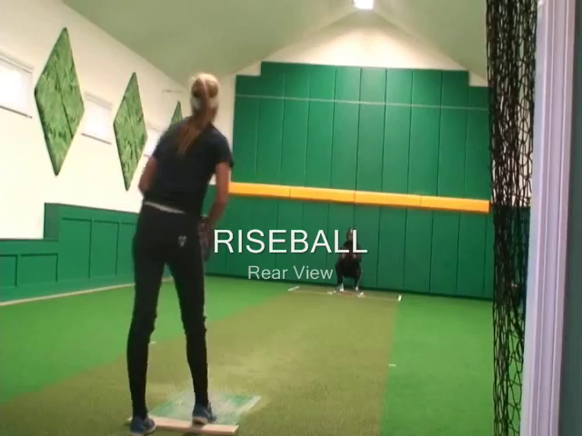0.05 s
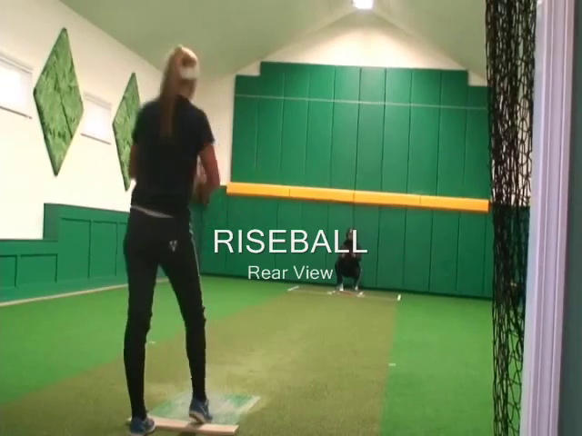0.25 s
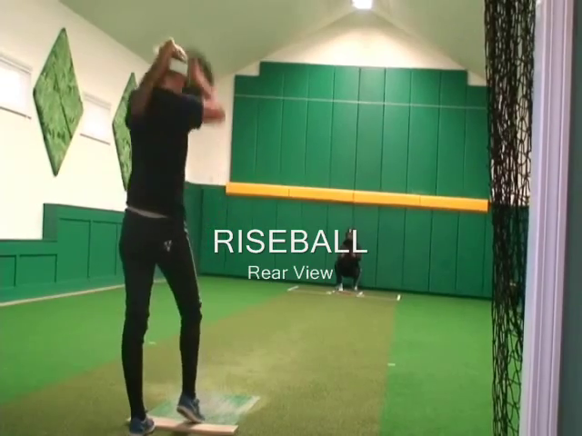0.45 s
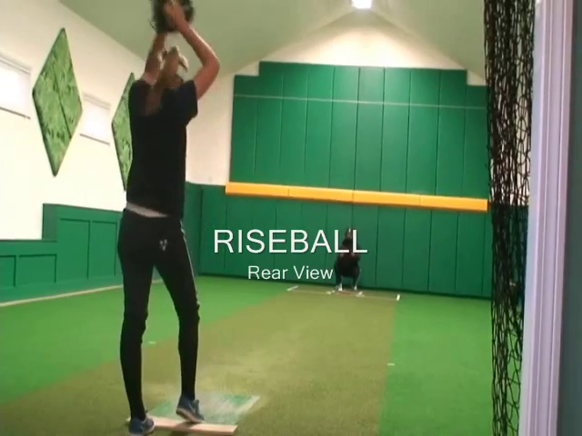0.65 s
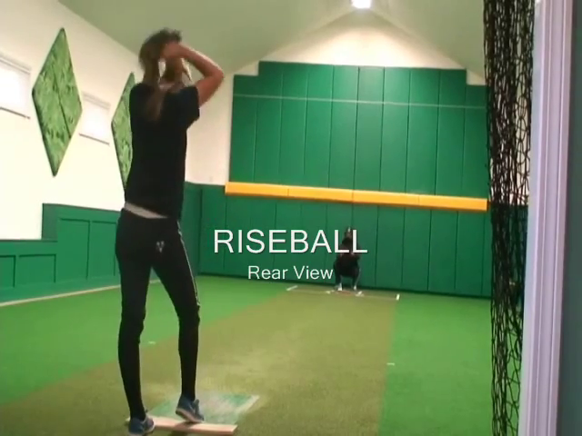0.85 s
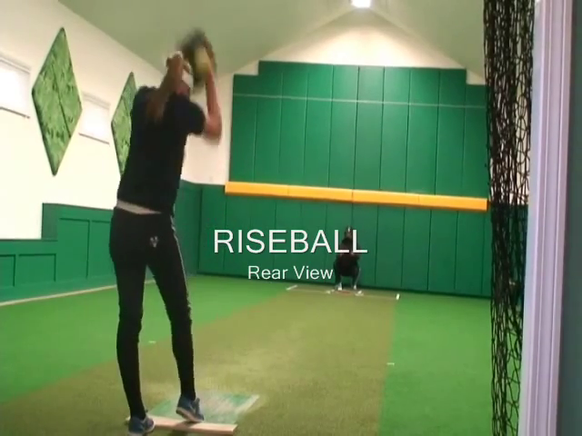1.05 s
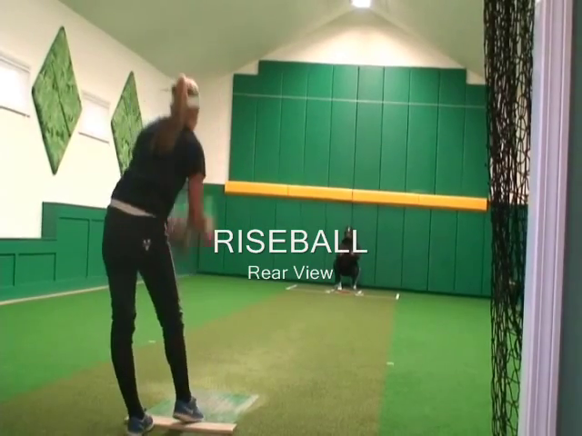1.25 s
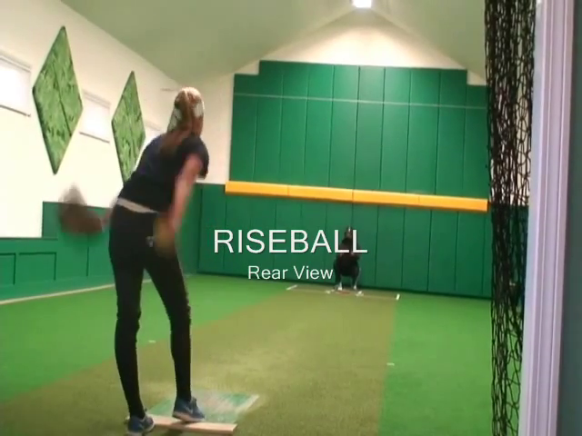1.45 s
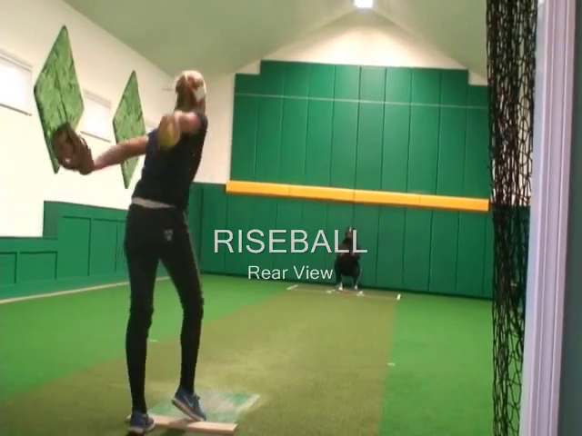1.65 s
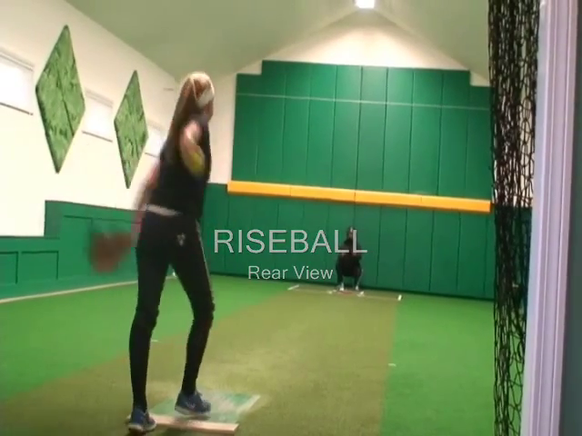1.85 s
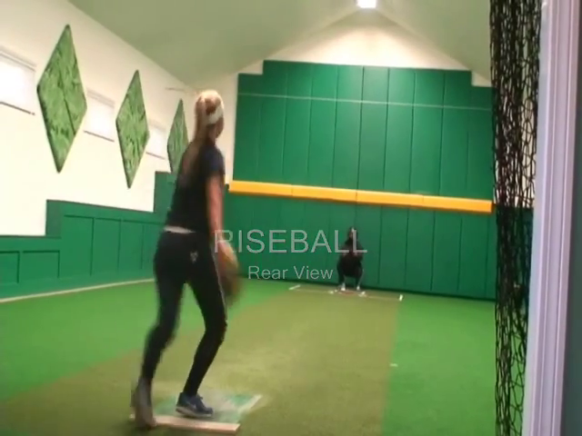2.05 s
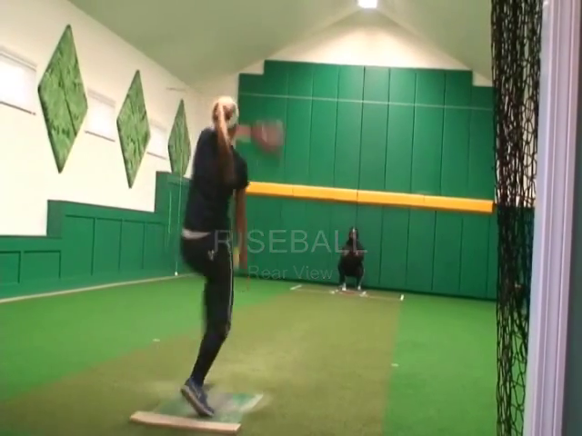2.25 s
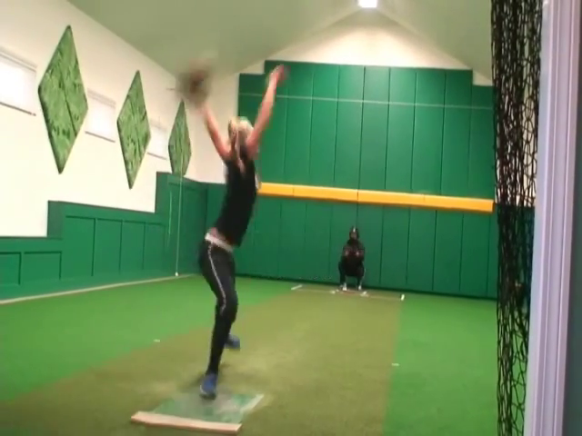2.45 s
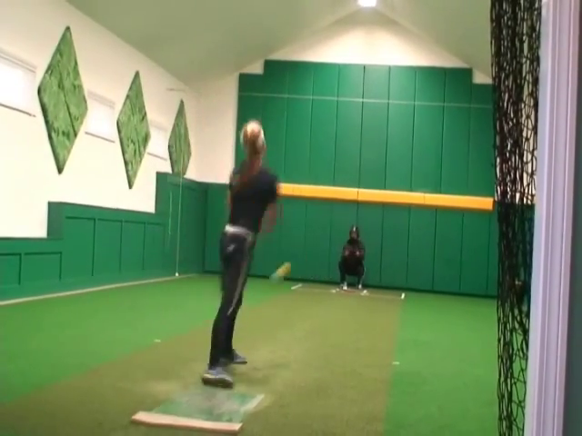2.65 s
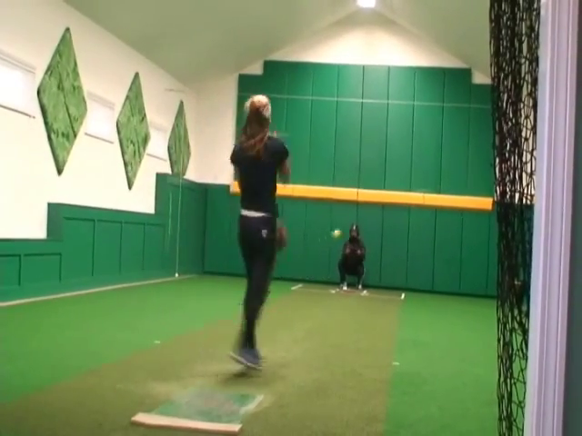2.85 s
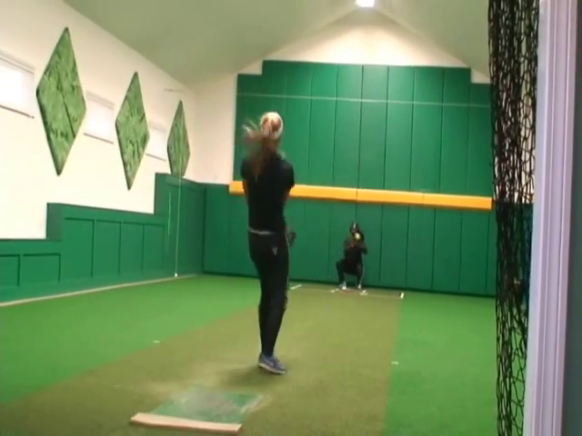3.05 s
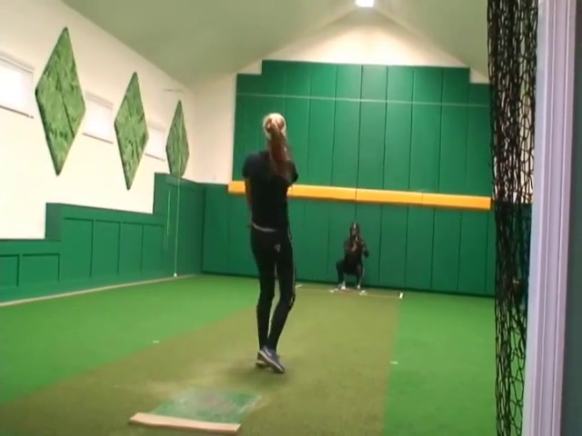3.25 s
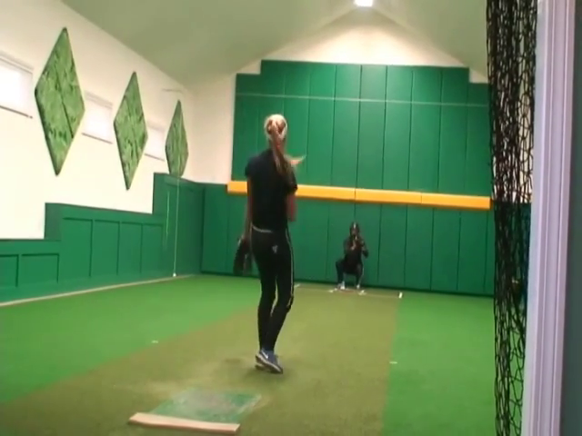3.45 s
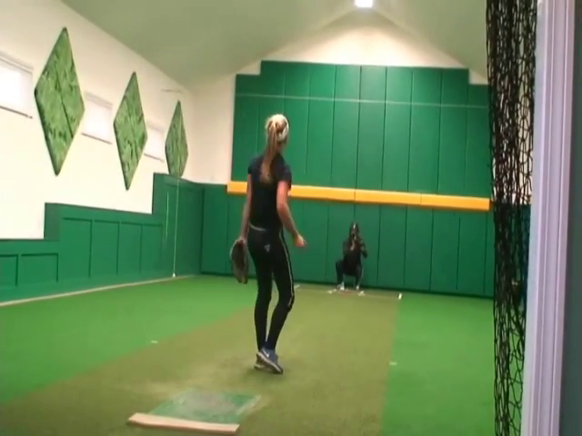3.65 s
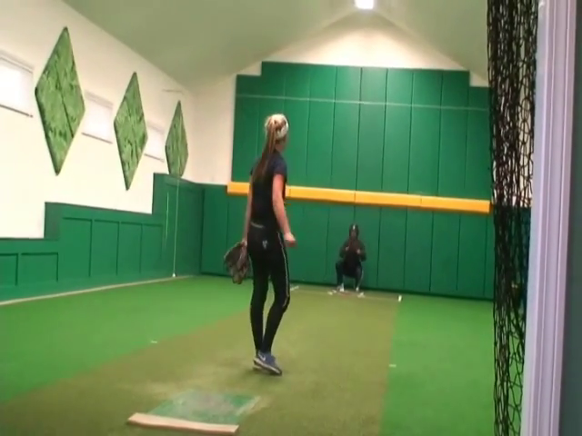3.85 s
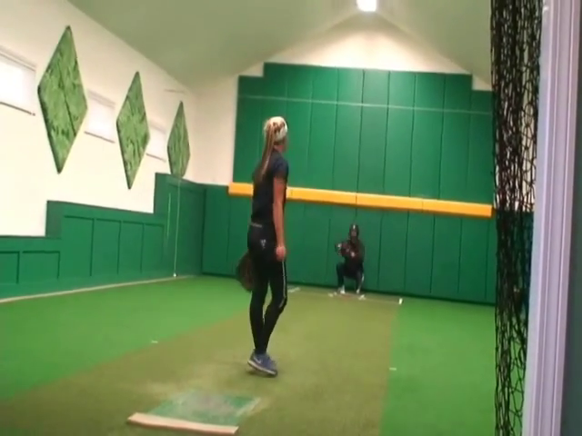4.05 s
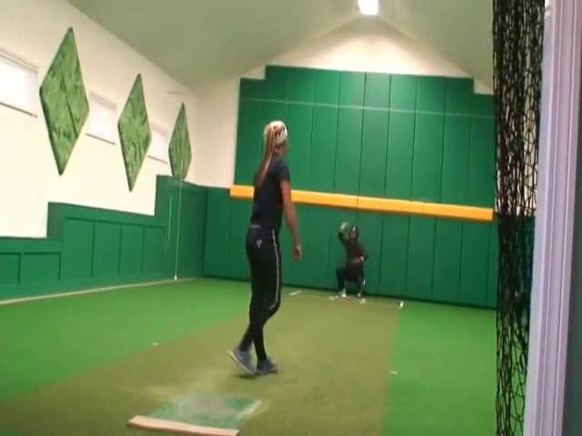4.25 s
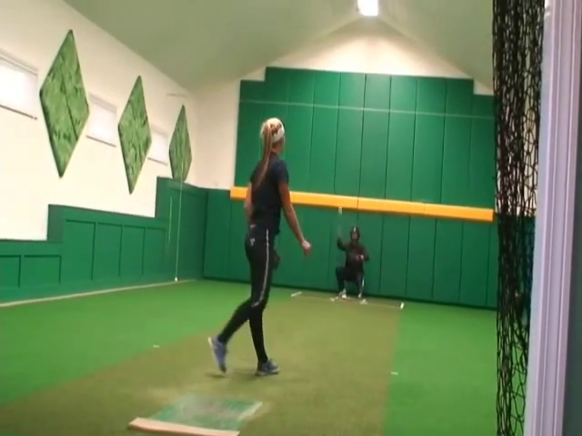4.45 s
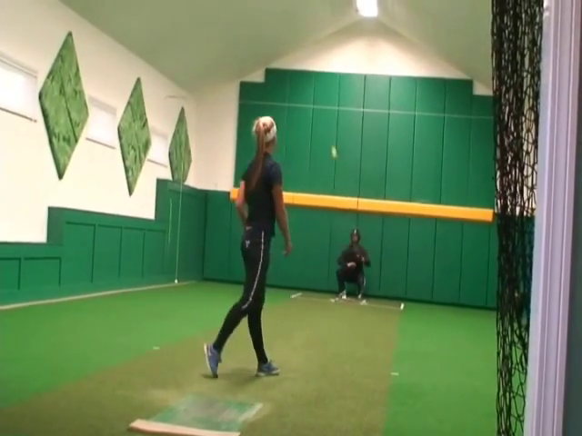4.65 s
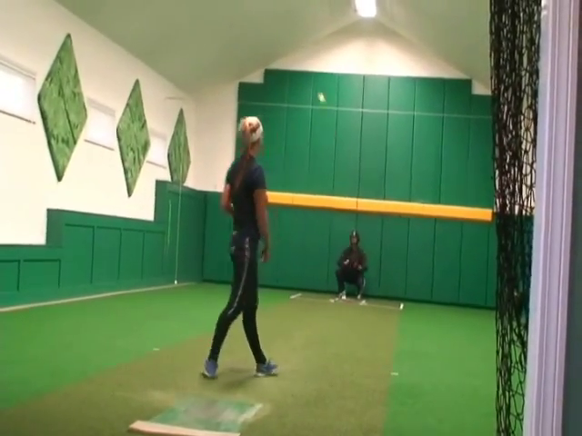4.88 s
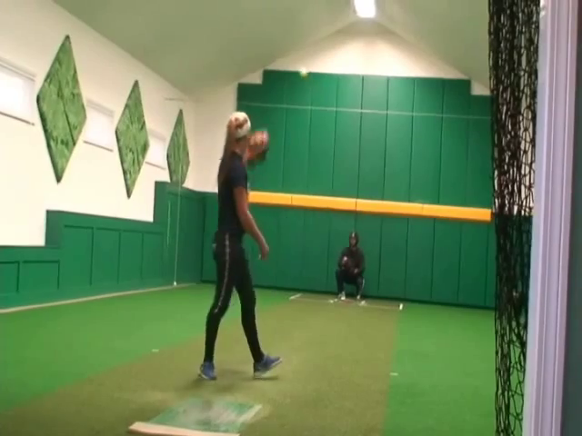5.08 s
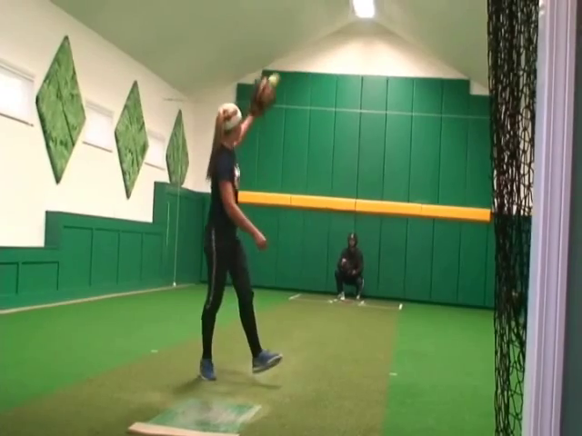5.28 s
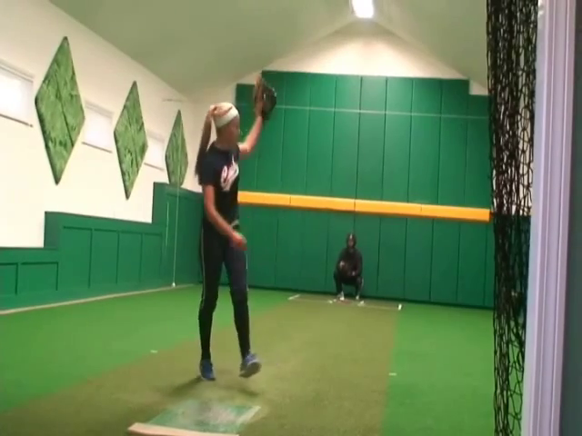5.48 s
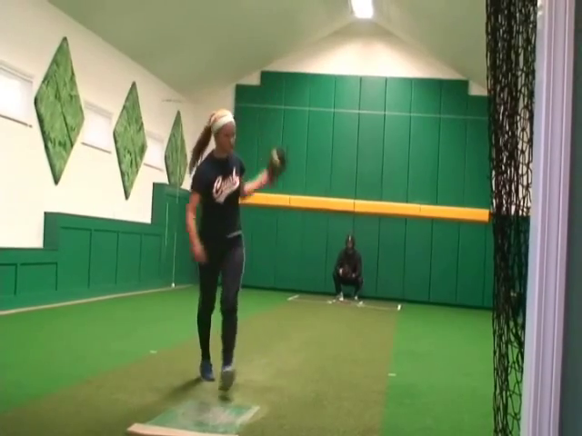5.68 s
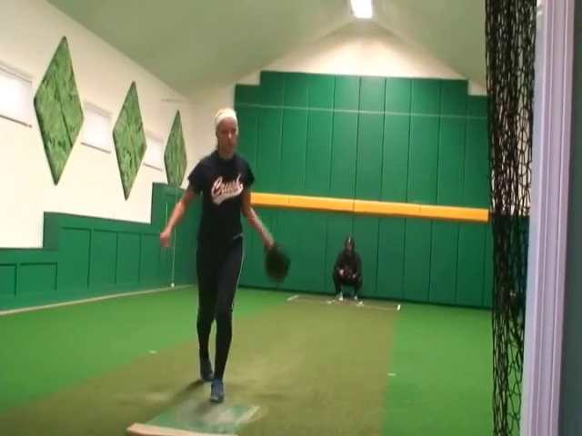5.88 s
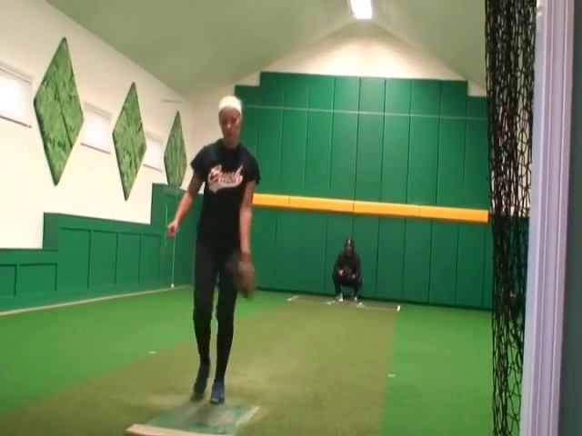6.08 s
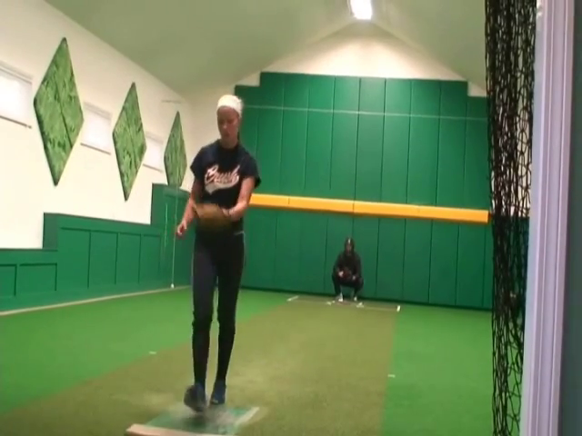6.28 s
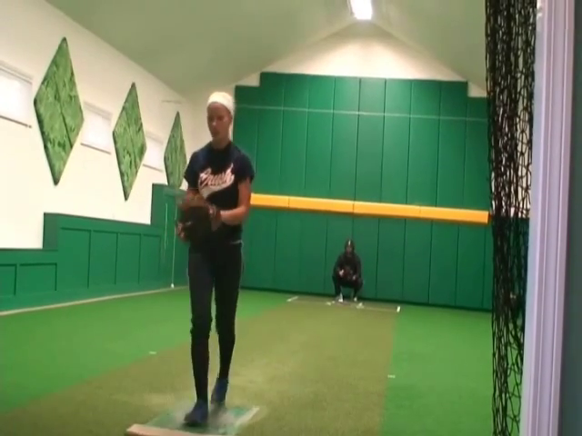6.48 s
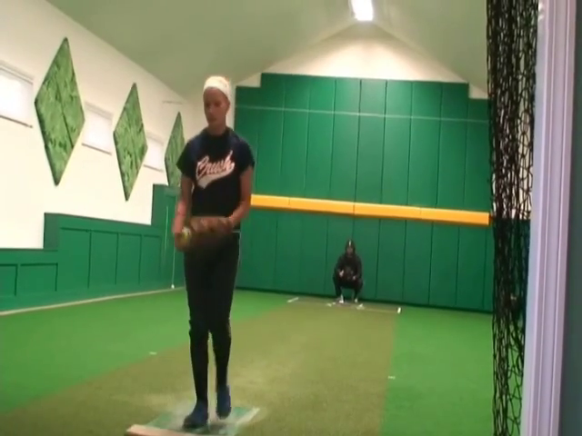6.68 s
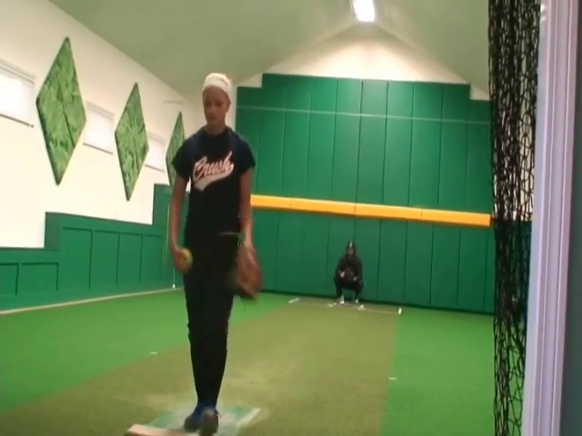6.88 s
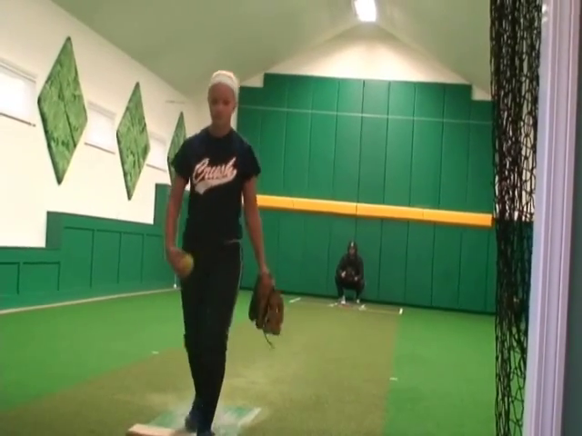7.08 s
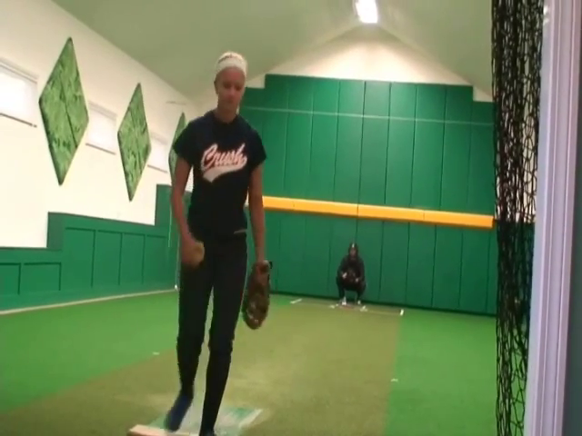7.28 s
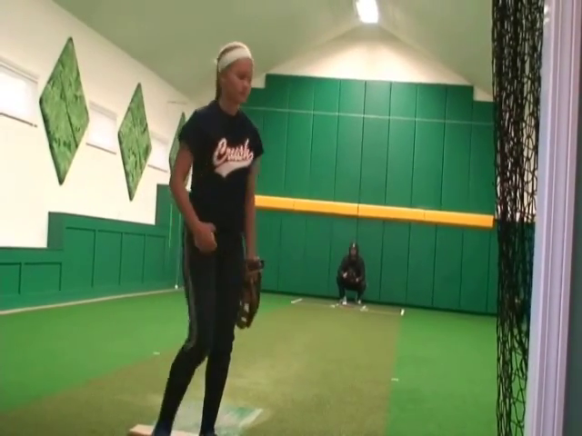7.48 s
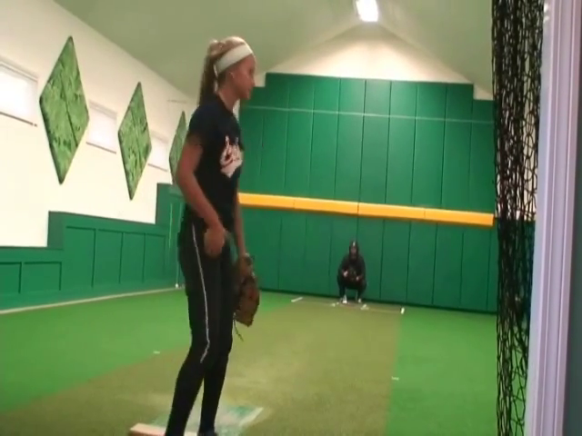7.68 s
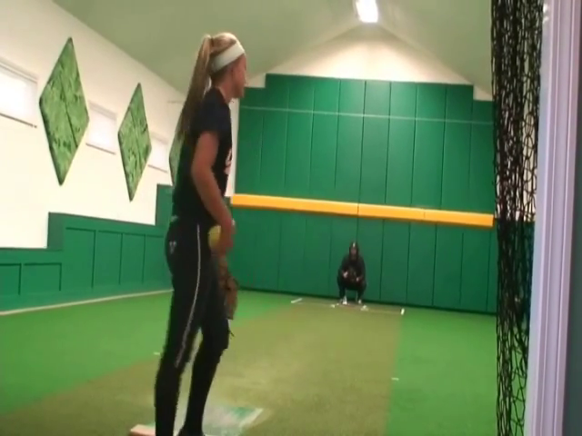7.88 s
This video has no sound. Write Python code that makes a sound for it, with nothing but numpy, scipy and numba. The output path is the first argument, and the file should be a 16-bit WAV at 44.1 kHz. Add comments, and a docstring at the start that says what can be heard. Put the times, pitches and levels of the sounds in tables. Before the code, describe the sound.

Over faint ventilation hum, a softball pitch cracks into a distant mitt with bright echoes, and the returned ball thuds into a close glove.

```python
"""A hard-walled indoor training room, heard in stereo from behind a softball pitcher.
Ventilation noise, wavering hum tones, a broad hiss hump and outside rumble are shaped noise and sines. Shoes
scuff the turf as grainy noise, and small things tick as short rings. The glove slaps the thigh, the ball smacks
the far mitt and later her own glove: decaying sines for leather and stitching, each with a push that sets the
room ringing. A limiter flattens the loud starts."""
import sys
import numpy as np
from scipy import signal
from scipy.fft import rfft, irfft, next_fast_len
from scipy.io import wavfile
from scipy.ndimage import uniform_filter1d
from numba import njit

SR = 44100
rng = np.random.default_rng(int(sys.argv[2]) if len(sys.argv) > 2 else 0)


def store_wav(level_fs):
    """Save 16-bit WAV to argv[1]."""
    pcm = np.round(np.clip(np.atleast_2d(level_fs), -1, 1) * 32767)
    wavfile.write(sys.argv[1], SR, pcm.T.astype(np.int16))


N = 349404
SIZE = next_fast_len(N)
FREQS = np.maximum(np.fft.rfftfreq(SIZE, 1 / SR), 1)  # Hz

# decay time of the room in octave bands: centre_hz, t60_s
ROOM_T60 = [(90, 0.66), (180, 0.98), (360, 0.84), (720, 1.037), (1440, 1.007), (2880, 0.9), (5760, 0.78),
            (11520, 0.42)]
# points at which the colour of a blow is adjusted: pitch_hz
TINT_HZ = [70, 250, 700, 1700, 2300, 3300, 4700, 8000, 13000]


def undb(db):
    """dB to gain."""
    return 10 ** (np.asarray(db) / 20)


def unit(x):
    """Scale to rms 1."""
    return x / np.sqrt(np.mean(x ** 2))


def read(table, hz):
    """Read a curve along straight lines on a log-frequency axis."""
    points = np.array(table)
    return np.interp(np.log(hz), np.log(points[:, 0]), points[:, 1])


def add(bus, start_s, x):
    """Mix x into the bus from start_s."""
    i = int(start_s * SR)
    bus[..., i:i + x.shape[-1]] += x[..., :N - i]


def band(hz, width_hz):
    """Noise in a bell-shaped band, rms 1."""
    bell = np.exp(-((FREQS - hz) / width_hz) ** 2)
    return unit(irfft(rfft(rng.standard_normal(SIZE)) * bell, SIZE)[:N])


def stereo_noise(alike, balance):
    """Noise spectra for left and right: a shared part and an opposed part."""
    likeness = np.clip(read(alike, FREQS), -.99, .99)
    mid, side = rfft(rng.standard_normal((2, SIZE)))
    mid = mid * np.sqrt((1 + likeness) / 2)
    side = side * np.sqrt((1 - likeness) / 2)
    pan = undb(read(balance, FREQS) / 2)
    return np.array([(mid + side) * pan, (mid - side) / pan])


def ring(modes, t):
    """Decaying sines that start together, as in a struck object."""
    return sum(undb(db) * np.sin(2 * np.pi * hz * t) * 10 ** (-3 * t / t60) for hz, db, t60 in modes)


def thin(x):
    """Take out the deep bass: small things radiate little below 220 Hz."""
    return signal.sosfilt(signal.butter(2, 220, "high", fs=SR, output="sos"), x)


@njit
def follow(x, attack, release):
    """Envelope that rises and falls at its own rates."""
    level, out = 0., np.empty(len(x))
    for i in range(len(x)):
        level += (x[i] - level) * (attack if x[i] > level else release)
        out[i] = level
    return out


def rumble(t):
    """Outside rumble that swells and draws away, a steady drone, and low swells in floor and walls."""
    # rumble curve: time_s, level_db near 100 Hz
    far_curve = [(0, -59.5), (.84, -54.5), (1.6, -56), (2.2, -51), (2.55, -55), (3.6, -62), (4.8, -65),
                 (5.4, -77.5), (7.92, -69)]
    # low swells: top_s, pitch_hz, level_db, rise_s, t60_s
    swells = [(2.55, 237, -55, .35, 1.5), (2.7, 50, -36, .02, .45), (2.83, 45, -43, .04, 1.2),
              (2.92, 98, -36.5, 0.21, 1.16), (3.3, 45, -44, .012, .3), (4.08, 254, -46, 0.21, 0.95),
              (4.81, 225, -55, 0.21, 4.1), (5.52, 90, -48, .012, .6), (7.1, 228, -63.5, 0.34, 0.74),
              (7.2, 41, -58, .15, 2.1)]
    deep_share_db, deep_steady_db, drone_db = -6, -69, -73.5
    far = undb(np.interp(t, *np.transpose(far_curve)))
    deep = far * undb(deep_share_db) + undb(deep_steady_db)
    out = far * band(101.4, 31) + deep * band(40, 22)
    out += undb(drone_db) * band(228, 45)
    for top_s, hz, level_db, rise_s, t60 in swells:
        rise = np.exp(-((t - top_s) / rise_s) ** 2)
        fall = 10 ** (-3 * (t - top_s) / t60)
        out += undb(level_db) * np.where(t < top_s, rise, fall) * band(hz, 0.29 * hz)
    return out


def hum(t):
    """Fan hum tones with wavering noise around them, and a broad hiss hump near 3.4 kHz over a very faint sine."""
    # hum tones, then the hiss hump: pitch_hz, steady_db, noise_width_hz, noise_db
    tones = [(570.3, -56.5, 4.5, -63.5), (593, -66.5, 6.5, -61.5), (963, -74.5, 23, -69),
             (3395, -96, 290, -63.5)]
    pan_db = -2.5  # left minus right
    out = 0
    for hz, steady_db, width_hz, noise_db in tones:
        out = out + undb(steady_db) * np.sqrt(2) * np.sin(2 * np.pi * hz * t)
        out = out + undb(noise_db) * band(hz, width_hz)
    return out * undb([[pan_db / 2], [-pan_db / 2]])


def air():
    """Steady ventilation noise and hiss under the hum and the rumble."""
    # ventilation and hiss before levelling: pitch_hz, level_db per Hz
    air_colour = [(12, -26.5), (20, -4.5), (109, -16.5), (144, -18), (252, -13.5), (427, -16), (478, -12),
                  (519, -13.5), (581, -7.5), (788, -17.5), (958, -13), (2400, -19.5), (3350, -20),
                  (5090, -24.5), (15500, -40)]
    # likeness of left and right: pitch_hz, likeness (-1 to 1)
    air_alike = [(60, 0.85), (130, 0.34), (290, 0.15), (640, 0.36), (1410, 0.21), (3100, 0.71),
                 (6820, 0.16), (15000, 0.38)]
    # stereo balance: pitch_hz, left_minus_right_db
    air_balance = [(60, 1), (110, -3), (200, 2), (380, -2.5), (700, -9.5), (1290, -2.5), (2380, -1.5),
                   (4400, 0), (8120, -7.5), (15000, 5)]
    level_db = -49
    spectra = stereo_noise(air_alike, air_balance) * undb(read(air_colour, FREQS))
    bed = undb(level_db) * unit(irfft(spectra, SIZE)[:, :N])
    t = np.arange(N) / SR
    return bed + hum(t) + rumble(t)


def room_bands():
    """Long stereo noise, split into the octave bands of the room."""
    # likeness of left and right: pitch_hz, likeness (-1 to 1)
    room_alike = [(60, 0.78), (130, 1), (640, 0.98), (1410, 0.83), (3100, 0.92), (6820, 0.96),
                  (15000, 0.77)]
    # stereo balance: pitch_hz, left_minus_right_db
    room_balance = [(200, 0.3), (540, -.5), (1290, 1.5), (2380, 2), (8120, 1.5), (15000, 0)]
    noise = stereo_noise(room_alike, room_balance)
    centres = np.log2(np.array(ROOM_T60)[:, 0])
    # each band fades linearly into its neighbours along the octaves
    return np.array([irfft(noise * np.interp(np.log2(FREQS), centres, row), SIZE)
                     for row in np.eye(len(centres))])


def echoes(bands, x, fill_ms, early_db, wall_db):
    """The room from one spot: bands die at their own rates, standing waves ring, the whole tail flutters slightly."""
    # standing waves: pitch_hz, level_db, t60_s
    standing = [(196, -20, 0.74), (258.3, -21.5, 0.78), (306, -17.5, 0.63), (430.3, -24, 0.85),
                (622.3, -23, 0.59), (763, -22, 0.92), (814, -22, 1.04)]
    late_db, late_slower = -27.5, 2.03  # the roof space gives back a weaker, slower tail
    wall_s, wall_spread_s, wall_tilt_db = 0.0785, 0.0025, 2  # there and back along the lane; tilt per octave
    early_s, flutter_db = 0.018, 1
    t = np.arange(int(1.5 * SR)) / SR
    start = rng.integers(SIZE - len(t))
    centres_hz, t60 = np.array(ROOM_T60)[:, :1], np.array(ROOM_T60)[:, 1:]
    decay = 10 ** (-3 * t / t60)
    decay = decay + undb(late_db) * decay ** (1 / late_slower)
    # the end wall sends back one bright bunch of echoes
    octaves = np.log2(centres_hz / 3000)
    bunch = np.exp(-((t - wall_s) / wall_spread_s) ** 2)
    decay *= 1 + undb(wall_db + wall_tilt_db * octaves) * bunch
    tail = np.einsum("bcn,bn->cn", bands[:, :, start:start + len(t)], decay) + ring(standing, t)
    wander = unit(uniform_filter1d(rng.standard_normal(len(t)), size=200))
    flutter = undb(flutter_db * wander)
    early = 1 + undb(early_db) * np.exp(-t / early_s)
    fill = 1 - np.exp(-(1000 * t / fill_ms) ** 0.5)
    return signal.fftconvolve(tail * early * fill * flutter, x[None], axes=1)


def tint(tilt_db, bass_db=0., low_db=0., body_db=0., sheen_db=0.):
    """Colour in dB at TINT_HZ: a tilt per octave about 700 Hz, with lifts at 70, 250, 2300 and from 8000 Hz."""
    hz = np.array(TINT_HZ)
    colour_db = tilt_db * np.log2(hz / 700)
    colour_db += bass_db * (hz == 70) + low_db * (hz == 250)
    return colour_db + body_db * (hz == 2300) + sheen_db * (hz >= 8000)


def push(tint_db, size=2048):
    """Causal response of a blow with its own colour, energy 1."""
    # a blow through air and microphone capsule, before scaling: pitch_hz, level_db per Hz
    blow_colour = [(40, -24.5), (147, -16.5), (189, -7.5), (382, -3.5), (630, 2), (873, -4), (1700, -5),
                   (2320, -11.5), (2850, -4.5), (3800, -6.5), (4600, -16.5), (5870, -16.5), (7540, -24),
                   (10400, -38), (16000, -69)]
    hz = np.maximum(np.fft.rfftfreq(size, 1 / SR), 20)
    colour_db = read(blow_colour, hz) + read(list(zip(TINT_HZ, tint_db)), hz)
    # folding the cepstrum gives minimum phase: the energy comes as early as it can
    cepstrum = irfft(np.log(undb(colour_db)), size)
    cepstrum[1:size // 2] *= 2
    cepstrum[size // 2 + 1:] = 0
    taps = irfft(np.exp(rfft(cepstrum)), size)
    return taps / np.sqrt(np.sum(taps ** 2))


def scuffs(bands):
    """Shoes and cloth rubbing: grainy friction noise that swells and fades, direct and in the room."""
    # rubs: start_s, length_s, near_db, room_db, tilt_db per octave, sheen_db above 8 kHz
    rubs = [(0.349, 0.17, -53, -57, 4, 0.1), (0.687, 0.053, -59, -57.5, -6, 0.1),
            (0.947, 0.062, -47, -52.5, -2.3, 2), (1.168, 0.071, -58, -56, -4, 0.1),
            (2.196, 0.1, -44, -44.5, 1.5, 6.5), (2.445, 0.064, -45, -44.5, 2, 14),
            (2.601, 0.066, -37, -31, 4.5, 9.5), (2.69, 0.33, -52, -21, 1.2, 5),
            (4.695, 0.057, -53.5, -49, -0.8, 8), (6.983, 0.15, -52, -46.5, 2.5, 6),
            (7.153, 0.073, -41, -37.5, 3.2, -6), (7.741, 0.088, -50.5, -43.5, 8.5, 3)]
    body_db = 4  # turf fills the band near 2.3 kHz
    out = np.zeros((2, N))
    for start_s, length_s, near_db, room_db, tilt_db, sheen_db in rubs:
        u = np.linspace(0, 1, int(length_s * SR))
        # the level jumps every 64 samples
        jumps_db = 0.9 * np.repeat(rng.exponential(size=len(u) // 64 + 1), 64)[:len(u)]
        grains = rng.standard_normal(len(u)) * undb(jumps_db)
        swell = np.sin(np.pi * u ** 0.94)
        colour = push(tint(tilt_db, body_db=body_db, sheen_db=sheen_db))
        rub = signal.fftconvolve(unit(grains * swell), colour)
        add(out, start_s, undb(near_db) * rub)
        into_room = undb(room_db) * rub / np.sqrt(len(u))
        add(out, start_s, echoes(bands, into_room, fill_ms=12, early_db=0, wall_db=-14.0))
    return out


def ticks():
    """Small hard things that click close to the microphone without stirring the room."""
    # dry ticks: start_s, bright_db, dull_db, ring_factor (multiplies mode levels in dB and ring times)
    clicks = [(0.726, -49, -61, 2.6), (1.195, -69, -44, 2), (3.955, -44, -45, 1.2),
              (4.061, -39, -29.5, 1.2), (4.1108, -12, -20, 0.9), (4.255, -56, -37, 1.1),
              (4.298, -60, -40, 1.3), (4.328, -55, -42, 1.2), (4.624, -58, -42, 2.8),
              (4.925, -60, -43, 2.2)]
    # bright modes before the ring factor: pitch_hz, level_db, t60_s
    bright_modes = [(3410, 6.5, 0.007), (2450, 3, 0.0033), (4510, 2, 0.0081), (5650, -4.5, 0.0093),
                    (7800, -8, 0.0066), (14000, -17, .003)]
    # dull modes before the ring factor: pitch_hz, level_db, t60_s
    dull_modes = [(586, -0.5, 0.02), (1086, 1.1, 0.022), (1880, -7, 0.01)]
    out, t = np.zeros((2, N)), np.arange(4096) / SR
    for start_s, bright_db, dull_db, slow in clicks:
        stretch = np.array([1, slow, slow])  # a larger factor rings longer and spreads the mode levels
        click = undb(bright_db) * ring(bright_modes * stretch, t)
        click = click + undb(dull_db) * ring(dull_modes * stretch, t)
        onset = 1 - np.exp(-t / (0.00016 * slow))
        add(out, start_s, thin(click * onset))
    return out


def contact(x, length_s):
    """Ragged contact: many tiny impacts within the contact time share the energy of the ring."""
    impacts = rng.standard_normal(256)[:int(length_s * SR)]
    y = np.convolve(x, impacts)
    return y * np.sqrt(np.sum(x ** 2) / np.sum(y ** 2))


def blow(thud_db, crack_db, delay_ms, wall_db, room):
    """A thud and a crack heard directly, the crack again off the end wall, and the ring of the room."""
    # leather pocket: pitch_hz, level_db, t60_s
    pocket = [(329, -8, 0.043), (736, 1.5, 0.022)]
    # stitched face: pitch_hz, level_db, t60_s
    face = [(1940, -20, 0.0038), (3110, 10.5, 0.0041), (4530, -4, 0.0035), (6200, -12, .004),
            (9000, -27, .003), (14000, -24, .003)]
    slap_s = .0025  # contact time of ball on leather
    wall_crack_s, wall_crack_db = .072, -6.5
    t, bus = np.arange(2048) / SR, np.zeros((2, room.shape[1]))
    crack = undb(crack_db) * contact(ring(face, t), slap_s)
    thud = undb(thud_db) * ring(pocket, t) * (1 - np.exp(-t / 0.0042))
    crack_s = delay_ms / 1000
    add(bus, 0, thin(thud))
    add(bus, crack_s, crack)
    add(bus, crack_s + wall_crack_s, undb(wall_db + wall_crack_db) * crack)
    return bus + room


def knocks(bands):
    """Knocks of shoes and ball handling nearby, each with one coloured push into the room."""
    # knocks: start_s, thud_db, crack_db, room_db, first_echoes_db, low_db near 250 Hz, tilt_db per octave
    shoes_and_ball = [(2.607, -33, -44, -39.5, 2, 4, -1.7), (2.689, -15, -34, -31, 7, 3, -2),
                      (2.783, -30, -22.5, -24.5, -15, 8, -1), (6.540, -21, -39, -39.5, 9, -1, -5.5),
                      (6.719, -48, -28, -35.5, 3, 11, 7.5)]
    fill_ms, wall_db, bass_db = 4.8, -9, -8
    out = np.zeros((2, N))
    for start_s, thud_db, crack_db, room_db, early_db, low_db, tilt_db in shoes_and_ball:
        into_room = undb(room_db) * push(tint(tilt_db, bass_db, low_db))
        room = echoes(bands, into_room, fill_ms, early_db, wall_db)
        add(out, start_s, blow(thud_db, crack_db, 0, wall_db, room))
    return out


def smacks(bands):
    """Ball and glove: slap on the thigh, pitch into the far mitt, catch of the return, each ringing the room."""
    # smacks: start_s, thud_db, crack_db, crack_delay_ms, room_db, room_fill_ms, far_wall_echo_db, bass_db,
    # low_db near 250 Hz, tilt_db per octave, body_db near 2.3 kHz, sheen_db above 8 kHz
    hits = [(2.813, 1, -10, .14, -1, 5.0, -1, 6.5, -3, -0.43, 2, 4.5),
            (3.2853, -15, 2, .1, 2.5, 48, -29, -6, -5, -0.13, -2, 5),
            (5.502, 11.5, 0.5, 2.8, -5.5, 28, 0, 1.5, .5, 2.5, 0, -4)]
    early_db = -20.5  # first echoes
    out = np.zeros((2, N))
    for (start_s, thud_db, crack_db, delay_ms, room_db, fill_ms, wall_db,
         bass_db, low_db, tilt_db, body_db, sheen_db) in hits:
        into_room = undb(room_db) * push(tint(tilt_db, bass_db, low_db, body_db, sheen_db))
        room = echoes(bands, into_room, fill_ms, early_db, wall_db)
        add(out, start_s, blow(thud_db, crack_db, delay_ms, wall_db, room))
    return out


def scene():
    """Air, scuffs, ticks, knocks and smacks, with a stereo phase that depends on pitch, left against right."""
    # stereo phase by pitch, left against right: pitch_hz, left_lead_rad
    stereo_phase = [(60, 0.01), (950, 0.34), (3530, 0.51), (5000, 1.89), (7320, 2.6), (9040, 4.4),
                    (10400, 5.9), (11600, 7.5), (16000, 6.2)]
    bands = room_bands()
    mix = air() + scuffs(bands) + ticks() + knocks(bands) + smacks(bands)
    spectra = rfft(mix, SIZE)
    spectra[1] *= np.exp(-1j * read(stereo_phase, FREQS))
    return irfft(spectra, SIZE)[:, :N]


def record(dry):
    """A quick limiter shared by left and right, soft clipping, then a steep cut of the top."""
    attack_s, release_s, threshold_db, top_hz = 0.00038, 0.016, -7.0, 15800
    level = follow(np.abs(dry).max(axis=0), 1 / (attack_s * SR), 1 / (release_s * SR))
    gain = np.minimum(1, undb(threshold_db) / (level + 1e-9)) ** 0.73  # below 1: not a full limit
    clipped = np.tanh(dry * gain)
    return signal.sosfilt(signal.ellip(16, .2, 130, top_hz, fs=SR, output="sos"), clipped)


dry = scene()
out = record(dry)
store_wav(out)
```